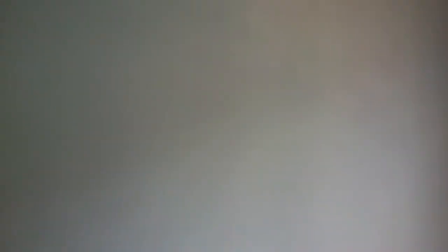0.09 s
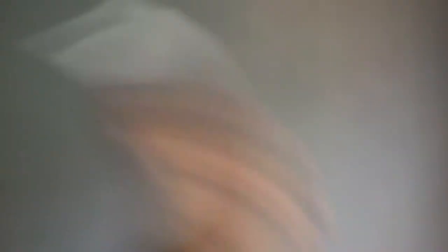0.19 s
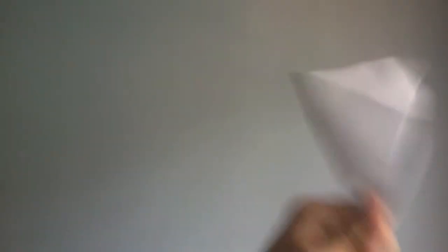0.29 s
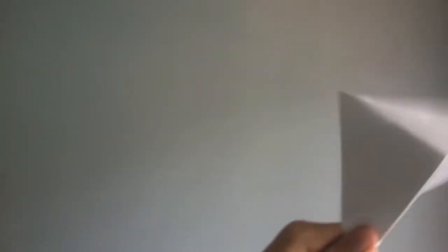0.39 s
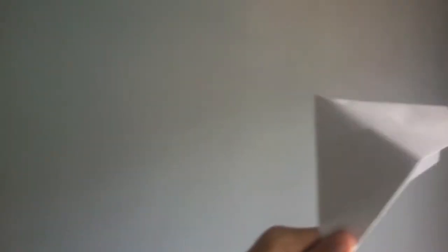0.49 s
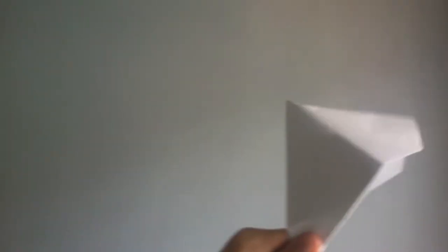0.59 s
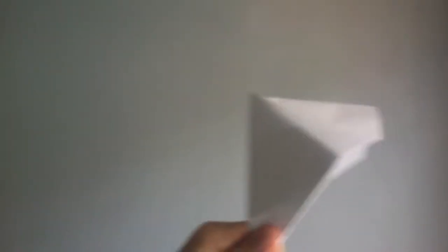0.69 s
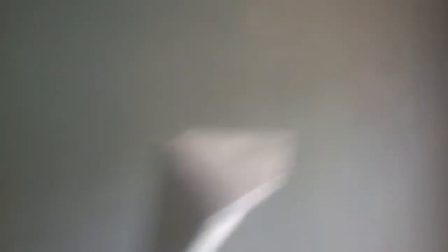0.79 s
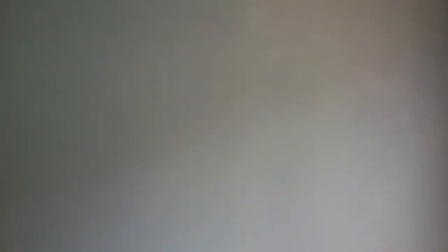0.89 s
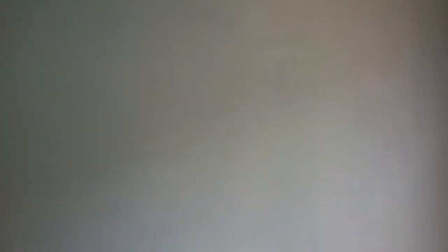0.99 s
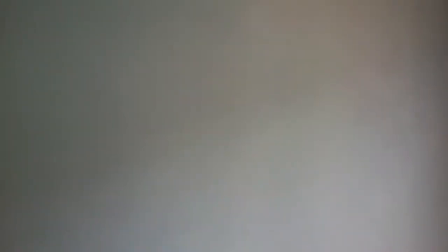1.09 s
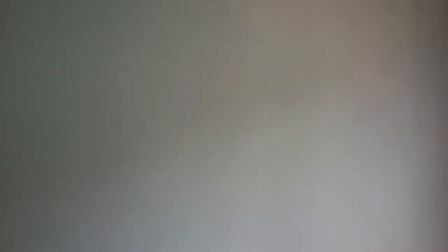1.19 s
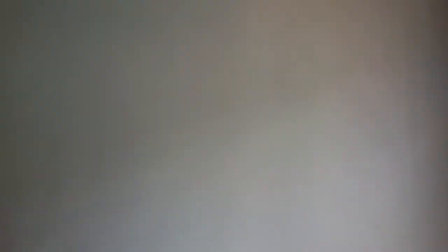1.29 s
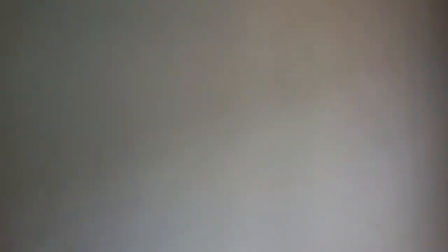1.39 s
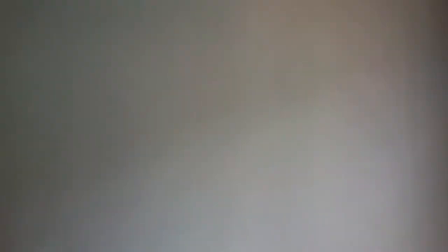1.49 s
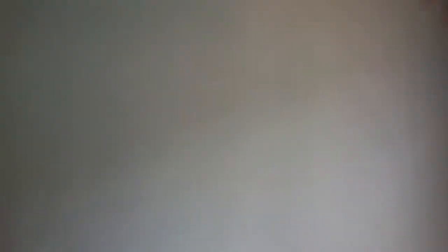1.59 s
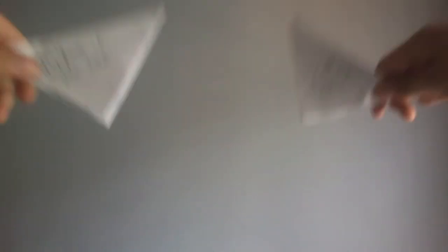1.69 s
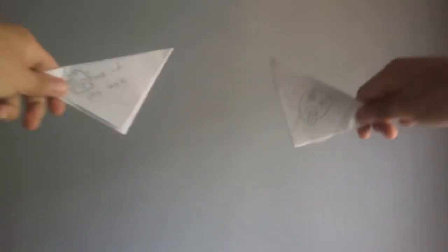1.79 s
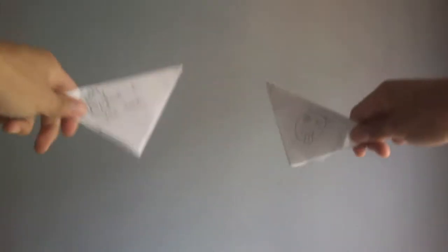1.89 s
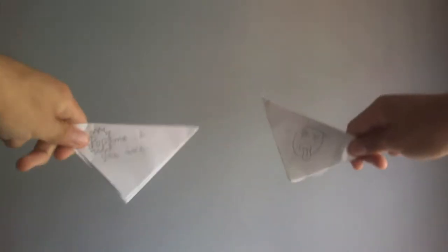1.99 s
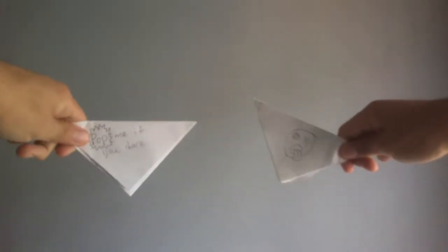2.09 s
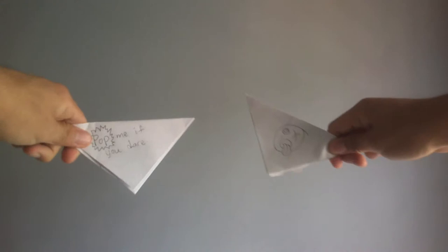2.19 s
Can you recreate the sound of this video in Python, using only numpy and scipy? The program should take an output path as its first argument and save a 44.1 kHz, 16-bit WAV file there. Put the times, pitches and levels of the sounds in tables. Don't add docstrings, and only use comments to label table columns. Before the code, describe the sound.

A folded paper popper snaps once at about 0.2 seconds: a very sharp, loud, dry crack, close to the microphone, after barely audible sleeve rubs. Hard bare walls answer at once, and the echoing wash dies over about a second. Soft cloth brushing swells near 1.1 seconds over faint traffic rumble and hiss. Sound fades to silence at 1.35, then quickly returns with faint rustles.

```python
import sys
import numpy as np
from scipy import signal
from scipy.fft import rfft, irfft, next_fast_len
from scipy.io import wavfile
from scipy.ndimage import uniform_filter1d, map_coordinates

SR = 44100
rng = np.random.default_rng(int(sys.argv[2]) if len(sys.argv) > 2 else 0)


def wav_record(signal):
    frames = np.transpose(np.atleast_2d(signal))
    bounded = np.clip(frames, -1, 1)
    quanta = np.round(bounded * 32767).astype(np.int16)
    wavfile.write(sys.argv[1], SR, quanta)


def rack_gain(trim_db):
    fader = np.asarray(trim_db, float)
    return 10 ** (fader / 20)


N = 97020
T = np.arange(N) / SR
POP_S, EDIT_S = 0.20378, 1.35


def unit(x):
    return x / np.sqrt(np.mean(x ** 2) + 1e-20)


def along(points, hz):
    f, v = np.transpose(points)
    return np.interp(np.log(hz + 1), np.log(f + 1), v)


def wobble(rate):
    knots = rng.standard_normal(int(N * rate / SR) + 4)
    return map_coordinates(knots, [np.arange(N) * rate / SR])


def filtered(x, response):
    m = next_fast_len(N + SR // 2)
    return irfft(rfft(x, m) * response(np.fft.rfftfreq(m, 1 / SR)), m)[..., :N]


def resonance(centre_hz, width_hz):
    return lambda f: 1j * f * width_hz / (centre_hz ** 2 - f * f + 1j * f * width_hz)


def noise(response):
    return unit(filtered(rng.standard_normal(N), response))


# frequency in Hz, level in dB per Hz.
RUMBLE_COLOUR = [(15, -28), (25, -3), (52, -0.5), (75, -14.5), (124, -13), (200, -24.5), (260, -56),
                 (440, -120)]
# frequency in Hz, level in dB per Hz.
HISS_COLOUR = [(120, -35), (200, -3), (440, -10.5), (482, -9.5), (1420, -15.5), (1680, -17), (16000, -29)]
RUMBLE_DB, FIRST_SHOT_DB = -64, 0.5
HISS_DB, HISS_WAVER_DB, HISS_WAVER_RATE = -72.5, 0.6, 6


def background():
    rumble = unit(noise(lambda f: rack_gain(along(RUMBLE_COLOUR, f))) * rack_gain(0.6 * wobble(25)))
    rumble_level = rack_gain(RUMBLE_DB + FIRST_SHOT_DB * (T < EDIT_S))
    hiss_level = rack_gain(HISS_DB + HISS_WAVER_DB * wobble(HISS_WAVER_RATE))
    hiss = noise(lambda f: rack_gain(along(HISS_COLOUR, f)))
    return rumble_level * rumble + hiss_level * hiss


# peak in seconds, rise
# in seconds, fall in seconds, level in dB, brightest frequency in Hz.
SLEEVE_RUBS = [(0.029, 0.046, 0.047, -82.5, 980), (.11, 0.059, 0.042, -75, 3500),
               (.175, 0.051, 0.034, -73, 2500), (0.971, .03, 0.046, -78, 5000),
               (1.085, 0.035, 0.058, -68, 549.4), (1.09, 0.018, .04, -60.5, 55),
               (1.075, 0.011, 0.052, -70, 2430), (1.14, .03, .045, -61.5, 7060),
               (1.165, 0.023, 0.051, -68.5, 1282), (1.24, 0.027, 0.041, -73, 6060),
               (1.46, 0.017, 0.034, -71.5, 196), (1.47, 0.12, 0.038, -75, 640.3),
               (1.55, 0.016, 0.034, -73.5, 9000), (1.62, 0.054, 0.11, -75, 4000),
               (1.96, 0.018, 0.036, -83, 2197), (2.14, 0.077, .08, -78.5, 2100)]
CLOTH_BROAD_DB, CLOTH_BROAD_SHARE = 0.5, 0.48
CLOTH_Q, CLOTH_GRAIN_DB = 1.1, 1


def sleeve():
    out = np.zeros(N)
    for peak_s, rise_s, fall_s, db, hz in SLEEVE_RUBS:
        hump = resonance(hz, hz / CLOTH_Q)

        def colour(f):
            lowpass = (f > 30) / (1 + f / (CLOTH_BROAD_SHARE * hz + 1))
            broad = rack_gain(CLOTH_BROAD_DB) * lowpass * f / (f + 150)
            return np.abs(hump(f)) ** 1.5 + broad

        rub = noise(colour) * rack_gain(CLOTH_GRAIN_DB * wobble(150))
        t = T - peak_s
        swell = np.where(t < 0, np.exp(-(t / rise_s) ** 2), 1 / np.cosh(t / fall_s))
        out += rack_gain(db) * rub * swell
    return out


DUCK_START_S, DUCK_END_S, DUCK_HZ, DUCK_DB = 0.1885, 0.1995, 500, -40


def dropout(quiet):
    duck = (T > DUCK_START_S) & (T < DUCK_END_S)
    treble = filtered(quiet, lambda f: 1 / (1 + (DUCK_HZ / (f + 1)) ** 4))
    return quiet - (1 - rack_gain(DUCK_DB)) * uniform_filter1d(duck * 1., size=40) * treble


def dying(t, t60):
    return (t >= 0) * rack_gain(-60 * np.abs(t) / t60)


# frequency in Hz, level in dB, t60 in seconds.
POCKET_RINGS = [
    (1550, -7.5, .0045),
    (4900, -18, .006),
]
LEAD_DB, LEAD_S = -32, 0.0014
PULL_DB, PULL_S = -2.4, 0.0001
FILL_START_S, FILL_S, FILL_DB = 0.00027, 0.00055, -2.8
FLUTTER_HZ, FLUTTER_WIDTH_HZ, FLUTTER_DB, FLUTTER_T60_S = 11400, 2000, -16.5, 0.0041
TEAR_DB, TEAR_T60_S = -21, 0.025


def popper():
    t = T - POP_S
    lead = rack_gain(LEAD_DB) * (t < 0) * np.exp(-np.abs(t) / LEAD_S)
    pull = -rack_gain(PULL_DB) * np.exp(-0.5 * (t / PULL_S) ** 2)
    filled = (t - FILL_START_S) / FILL_S
    cutoff = np.clip((1 - filled) * FILL_S * SR / 2 + 1, 0, 1)
    inrush = rack_gain(FILL_DB) * np.clip(filled, 0, 1) * cutoff
    stop = t - FILL_START_S - FILL_S
    ring = -sum(rack_gain(db) * dying(stop, t60) * np.cos(2 * np.pi * hz * stop) for hz, db, t60 in POCKET_RINGS)
    swell = np.clip(filled + 0.5, 0, 1)
    after = np.maximum(stop, 0)
    flutter = rack_gain(FLUTTER_DB) * noise(resonance(FLUTTER_HZ, FLUTTER_WIDTH_HZ))
    flutter = flutter * rack_gain(-60 * after / FLUTTER_T60_S)
    tear = rack_gain(TEAR_DB) * rng.standard_normal(N) * rack_gain(-60 * after / TEAR_T60_S)
    return lead + pull + inrush + ring + swell * (flutter + tear)


ROOM_RISE_S = 0.0027


def tail(t60_of, colour):
    hz, t, z = signal.stft(rng.standard_normal(N), SR, nperseg=512)
    decay = rack_gain(-60 * t / t60_of(hz)[:, None])
    r = signal.istft(z * colour(hz)[:, None] * decay, SR, nperseg=512)[1][:N]
    r = r * (1 - np.exp(-T / ROOM_RISE_S))
    return r / np.linalg.norm(r)


# delay in seconds, level in dB.
WALL_ECHOES = [
    (.0055, -12),
    (.0085, -15),
    (0.0114, -15.5),
    (.0172, -17),
    (.0213, -15),
]
WALL_HZ = 3500
# frequency in Hz, t60 in seconds.
ROOM_T60 = [(60, 0.98), (260, 1), (700, .62), (1840, 0.44), (4850, .5), (12800, 0.44)]
# frequency in Hz, level in dB.
WASH_COLOUR = [(50, -29.5), (140, -18.5), (300, -9.5), (1000, -0.5), (2350, -1), (2750, -9), (7000, -12.5),
               (15000, -19.5)]
# frequency in Hz, level in dB.
BEYOND_COLOUR = [(60, -22.5), (300, -9), (800, 2.5), (2350, -4), (2650, -12), (7000, -20.5), (12000, -30.5)]
# frequency in Hz, level in dB, t60 in seconds.
STANDING_WAVES = [(114.5, -54.5, 1.3), (169.2, -44.5, .5), (244.2, -42, .9), (262.6, -46, 1),
                  (359, -40, 0.6), (503, -39.5, 0.59), (551.5, -42.5, 0.81), (927, -38.5, 0.51),
                  (1002, -39.5, .6), (1099, -39.5, .5), (1906, -44.5, .5), (2170, -42.5, 0.88)]
WASH_DB, BEYOND_DB, BEYOND_T60_S, STANDING_WAVER_DB = -3, -15, 1.4, 2.5


def wall_response(f):
    echoes = sum(rack_gain(db) * np.exp(-2j * np.pi * f * s) for s, db in WALL_ECHOES)
    return -echoes / (1 + 1j * f / WALL_HZ)


def room(x):
    walls = filtered(x, wall_response)
    wash = rack_gain(WASH_DB) * tail(lambda f: along(ROOM_T60, f), lambda f: rack_gain(along(WASH_COLOUR, f)))
    beyond = tail(lambda f: BEYOND_T60_S + 0 * f, lambda f: rack_gain(along(BEYOND_COLOUR, f)))
    standing = np.zeros(N)
    for hz, db, t60 in STANDING_WAVES:
        level = rack_gain(db + STANDING_WAVER_DB * wobble(14) - 60 * T / t60)
        standing += level * np.sin(2 * np.pi * hz * T)
    answer = np.linalg.norm(x) * (wash + rack_gain(BEYOND_DB) * beyond) + standing
    return walls + np.pad(answer, (round(POP_S * SR), 0))[:N]


def scene():
    quiet = dropout(background() + sleeve())
    pop = popper()
    mono = quiet + pop + room(pop)
    return np.array([mono, mono])


FADE_OUT_S, FADE_IN_S, FADE_SHAPE = 0.14, 0.1, 1.03
TOP_HZ, TOP_EDGE_HZ = 15750, 500


def top_response(f):
    return np.sin(np.pi / 2 * np.clip((TOP_HZ - f) / TOP_EDGE_HZ + 0.5, 0, 1)) ** 2


def roll_off(x):
    return signal.sosfilt(signal.butter(12, 16710, fs=SR, output="sos"), x)


def record(dry):
    ramp = np.where(T < EDIT_S, (EDIT_S - T) / FADE_OUT_S, (T - EDIT_S) / FADE_IN_S)
    fade = np.sin(np.pi / 2 * np.clip(ramp, 0, 1)) ** FADE_SHAPE
    mix = filtered(dry * fade, top_response)
    return roll_off(mix)


dry = scene()
out = record(dry)
wav_record(out)
```